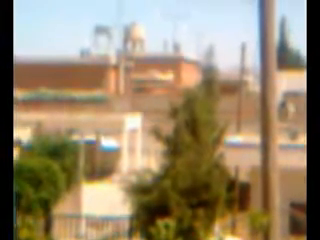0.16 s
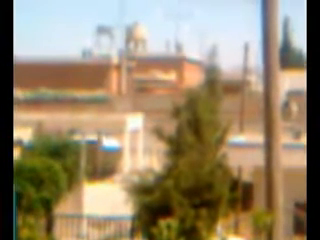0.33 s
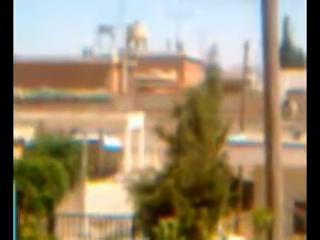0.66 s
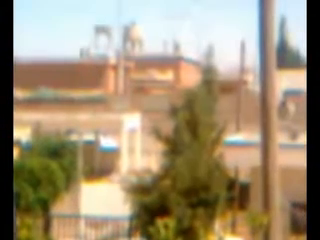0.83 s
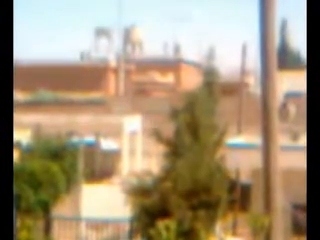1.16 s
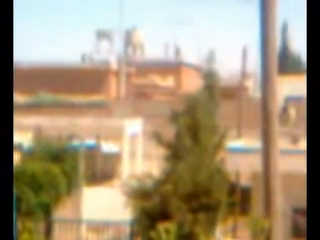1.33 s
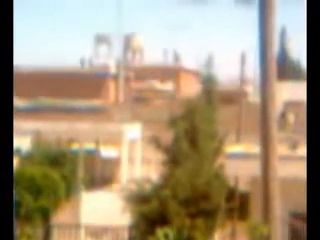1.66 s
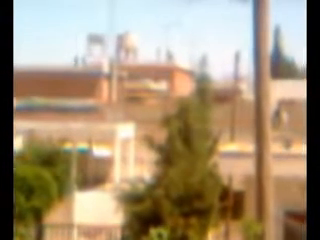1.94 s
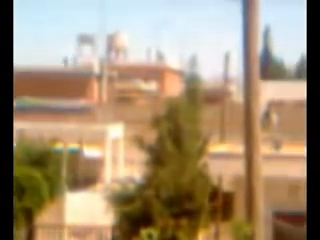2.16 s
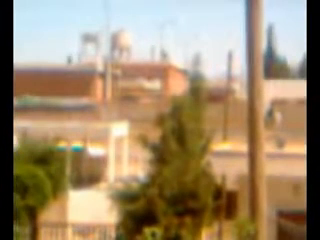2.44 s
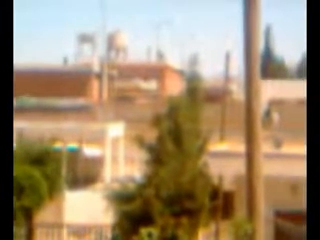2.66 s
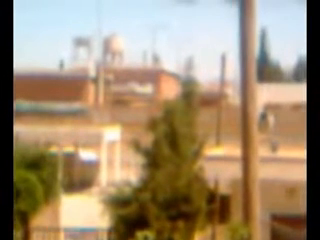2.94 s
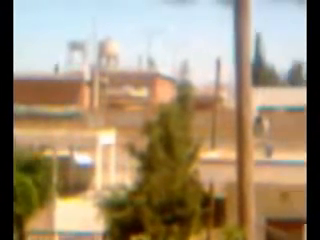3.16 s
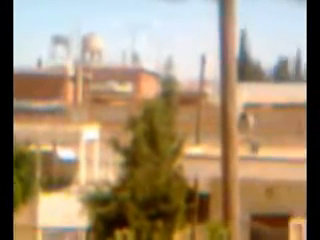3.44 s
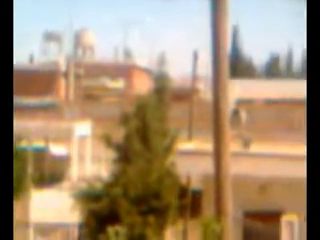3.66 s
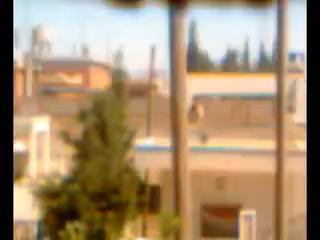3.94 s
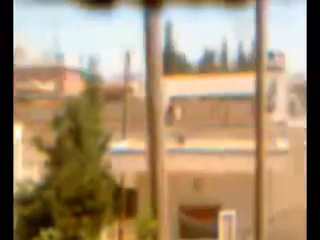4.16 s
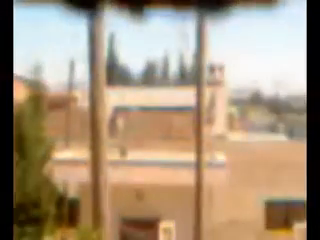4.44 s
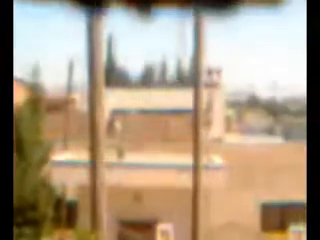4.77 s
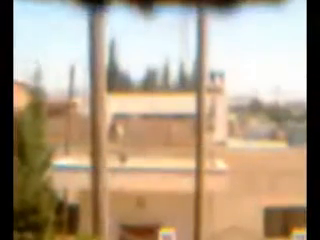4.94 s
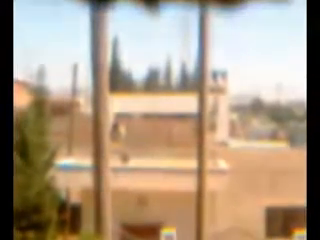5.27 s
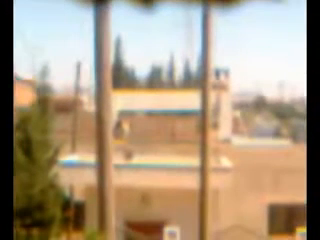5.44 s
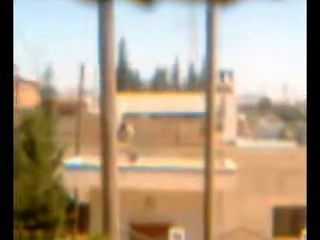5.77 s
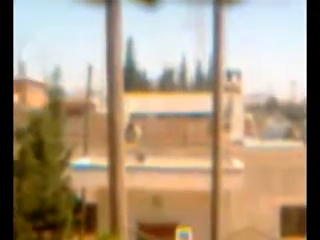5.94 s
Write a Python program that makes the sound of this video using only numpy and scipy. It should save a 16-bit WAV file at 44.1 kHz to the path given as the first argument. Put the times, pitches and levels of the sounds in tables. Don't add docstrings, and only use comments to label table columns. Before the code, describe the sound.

A long burst of automatic rifle fire cracks and booms across a town, then two duller distant shots and two sharp louder ones, on an overloaded microphone.

```python
import sys
import numpy as np
from scipy import signal
from scipy.fft import rfft, irfft, next_fast_len
from scipy.io import wavfile
from scipy.ndimage import uniform_filter1d

SR = 44100
rng = np.random.default_rng(int(sys.argv[2]) if len(sys.argv) > 2 else 0)


def convert_level_to_amplitude(level_db):
    exponent = np.asarray(level_db, float) / 20
    return 10 ** exponent


def pcm_store(signal):
    levels = np.round(np.clip(np.atleast_2d(signal), -1, 1) * 32767)
    wavfile.write(sys.argv[1], SR, levels.astype(np.int16).T)


N = 269451
LEAD = 52920


def linear(points, at):
    return np.interp(at, *np.transpose(points))


def read(points, at):
    x, value = np.transpose(points)
    return np.interp(np.log(at + 1), np.log(x + 1), value)


def evened(x):
    return x / np.sqrt(np.mean(x ** 2) + 1e-20)


def add(mix, s, sound):
    part = mix[LEAD + round(s * SR):][:len(sound)]
    part += sound[:len(part)]


def coloured(x, spectrum, size=4096):
    hz = abs(np.fft.fftfreq(size, 1 / SR))
    gain_db = np.maximum(read(spectrum + [(SR / 2, -90)], hz), -90)
    log_gain = np.log(convert_level_to_amplitude(gain_db))
    response = np.exp(np.conj(signal.hilbert(log_gain)))
    taps = np.fft.ifft(response).real[:size // 2]
    return signal.oaconvolve(x, taps / np.linalg.norm(taps))[:len(x)]


def scatter(envelope, per_s=2500., spread_db=0.0, clump_db=-1.0):
    draw = rng.random((len(envelope), 4))
    clumps = evened(uniform_filter1d(uniform_filter1d(draw[:, 3] - .5, size=130), size=90))
    uneven_db = spread_db * np.minimum(-np.log(draw[:, 1] + 1e-9), 4)
    size = convert_level_to_amplitude(uneven_db + clump_db * clumps) * np.sign(draw[:, 2] - .5)
    present = draw[:, 0] < per_s / SR
    return envelope * evened(size * present)


def taps_of(rows, wobble_db=4.0):
    out = np.zeros(SR // 10)
    for s, db in rows:
        out[round(abs(s) * SR)] += convert_level_to_amplitude(db + wobble_db * rng.uniform(-0.66, 1))
    return out


def burst():
    # (crack arrives [s], crack peak [dB])
    swing_in = [(0.0, 0), (0.116, -0.5), (0.2253, -2), (0.3239, -2), (0.4341, -7.5), (0.5502, -7),
                (0.6498, 3), (0.7642, -1.5), (0.8579, 0.5), (0.9623, -3), (1.055, -1.5), (1.1672, -9),
                (1.272, -4.5), (1.3703, -7), (1.482, -12.5), (1.5836, -2.5), (1.6891, -15.5), (1.8102, -24),
                (1.9022, -21), (2.017, -20.5), (2.1185, -18.5), (2.2324, -10), (2.347, -10)]
    # (crack arrives [s], crack peak [dB])
    swing_out = [(2.452, -6), (2.5512, -4.5), (2.6531, -8), (2.7598, -7.5), (2.8645, -5.5), (2.9552, -4),
                 (3.0544, -10), (3.1487, -9), (3.2561, -4), (3.3487, -6.5), (3.4372, -7), (3.5304, -4),
                 (3.6254, -6.5), (3.71, -3.5), (3.8265, -1), (3.9396, -1), (4.0535, -1.5), (4.168, -2.5),
                 (4.2868, -4.5), (4.4048, -3.5)]
    # (time [s], lag [ms])
    aim = [(-.1, 108.5), (.35, 107.5), (.55, 105), (.85, 106), (1.27, 100.5), (1.69, 86), (1.82, 82),
           (2.25, 81.5), (2.5, 77.5), (2.86, 76), (3.15, 90.5), (3.44, 113), (3.7, 123), (3.83, 130),
           (4.05, 130), (4.17, 136), (4.41, 134.5)]
    # (time [s], level [dB])
    muzzle = [(-.1, 0.5), (.5, -6), (1.1, -4), (1.6, -2.5), (2.1, 2), (2.4, -0.5), (2.8, 2.5), (3.05, 1.5),
              (3.25, -1.5), (3.45, -22), (3.7, -13), (4.0, -25.5), (4.3, -39.5), (4.41, -12.5)]
    # (frequency [Hz], level [dB])
    crack_spectrum = [(60, -30), (400, -20.5), (900, -18), (1400, -10), (1900, -2.5), (2300, -0.5),
                      (2600, -3), (2900, -11), (3500, -22.5), (4000, -37.5)]
    # (delay [s], level [dB])
    crack_taps = [
        (0, 0),
        (.00087, -3),
        (.0013, -3),
        (.0022, -8),
        (.041, -6),
    ]
    # (delay [s], level [dB])
    near_wall_taps = [(.0135, 0), (.0144, -3)]
    # (time [s], level [dB])
    near_wall = [(-1, -11), (1, -10), (2, -8), (3.5, -8), (4, -12), (4.4, -13)]
    # (delay [s], level [dB])
    walls = [(.002, -23.5), (.005, -5), (.013, -6), (.019, 0.5), (.027, -3.5), (.031, -0.5), (.055, -14.5),
             (.1, -23.5), (.2, -52)]
    # (frequency [Hz], level [dB])
    boom_spectrum = [(40, -30), (90, -17), (190, -11), (290, 0), (400, -4), (500, -7), (700, -16),
                     (1050, -16), (1500, -27), (4000, -60)]
    # (delay [s], level [dB])
    boom_taps = [(.001, -2), (.0049, -3.1), (.0087, -11.5), (.016, -16), (.0195, -17)]
    # (delay [s], level [dB])
    boom_echo_taps = [(.0248, -4), (.028, 1), (.0312, -4), (.0344, -0.5), (.055, -0.5), (.0585, -22)]
    # (frequency [Hz], level [dB])
    roll_spectrum = [(40, -35), (90, -6.5), (200, -9.5), (320, -0.5), (480, -5.5), (700, -10),
                     (1000, -23.5), (4000, -44)]
    # (frequency [Hz], level [dB])
    splash_spectrum = [(60, -35), (300, -2.5), (700, -17), (1050, -3), (1400, -4), (2200, -4.5),
                       (2700, -14.5), (3300, -16), (4000, -37.5)]

    boom_db, boom_echo_db, bright_db, wall_db, roll_db = -17, -14, -9, -5, -3
    echo_follows, bright_follows, wall_follows = .06, 0.39, 0.16
    shaded_ms, loss_db_per_ms = 128, 0.26
    round_spread_db = 2.17
    earlier_period_s, earlier_rounds = .1, 10

    cracks, booms, rolls, splash = np.zeros((4, LEAD + N))
    t = np.arange(SR // 5) / SR
    wall_decay = convert_level_to_amplitude(linear(walls, t))
    roll_decay = convert_level_to_amplitude(-60 * t / .2) * np.minimum(t / .02, 1)
    splash_decay = convert_level_to_amplitude(-60 * t / 0.18) * np.minimum(t / 0.0026, 1)
    earlier = [(-earlier_period_s * k, swing_in[1][1]) for k in range(earlier_rounds, 0, -1)]
    for s, crack_db in earlier + list(swing_in) + list(swing_out):
        add(cracks, s, convert_level_to_amplitude(crack_db + 15.5) * taps_of(crack_taps))
        add(cracks, s, convert_level_to_amplitude(linear(near_wall, s) + 18) * taps_of(near_wall_taps))
        add(cracks, s, scatter(convert_level_to_amplitude(wall_db + wall_follows * crack_db) * wall_decay, clump_db=2.0))

        lag_ms = linear(aim, s)
        later = s + lag_ms / 1000
        muzzle_db = linear(muzzle, s)
        luck_db = round_spread_db * rng.standard_normal(3)
        echo_db = boom_echo_db + echo_follows * muzzle_db + luck_db[1]
        echo_db -= loss_db_per_ms * max(lag_ms - shaded_ms, 0)
        splash_db = bright_db + bright_follows * muzzle_db + luck_db[2]
        direct_db = boom_db + muzzle_db + luck_db[0]
        add(booms, later, -convert_level_to_amplitude(direct_db + 26.5) * taps_of(boom_taps, wobble_db=6.5))
        add(booms, later, -convert_level_to_amplitude(echo_db + 14.0) * taps_of(boom_echo_taps, wobble_db=2.0))
        add(rolls, later, scatter(convert_level_to_amplitude(echo_db + roll_db) * roll_decay, per_s=1800.0))
        add(splash, later, scatter(convert_level_to_amplitude(splash_db) * splash_decay, per_s=2400.0))
    diffuse = coloured(rolls, roll_spectrum) + coloured(splash, splash_spectrum)
    return coloured(cracks, crack_spectrum), coloured(booms, boom_spectrum), diffuse


def singles():
    # (time [s], peak [dB], echoes [dB], dullness [0-1], edge [0-1])
    far_gun = [
        (5.139, -12, -13, 0.47, 0.23),
        (5.437, -13.5, -13.5, 0.84, 0.65),
    ]
    # (time [s], peak [dB], echoes [dB], dullness [0-1], edge [0-1])
    near_gun = [
        (5.807, -0.8, -8, 0.06, 0.3),
        (6.063, -0.95, -4, 0.0068, 0.13),
    ]
    # (delay [s], level [dB], scatter t60 [s])
    far_echoes = [(.004, -9.5, 0.017), (.019, -13, 0.074), (.044, -11, 0.19), (.093, -12, 0.27),
                  (.136, -4.5, 0.068), (.151, -18, 0.19), (.161, -5, 0.062), (.177, -10, 0.13),
                  (.249, -56, 0.21)]
    # (delay [s], level [dB], scatter t60 [s])
    near_echoes = [(.003, -20.5, .05), (.017, -5, .04), (.03, -1.5, .15), (.074, -6, .14),
                   (.147, -46, 0.087)]
    # (frequency [Hz], level [dB])
    near_spectrum = [(60, -38.5), (500, -25.5), (800, -10), (1200, 1.5), (1600, -4.5), (2200, 0),
                     (2600, -8.5), (3200, -34), (4000, -35)]
    # (frequency [Hz], level [dB])
    far_spectrum = [(60, -30.5), (250, -7), (500, -7), (800, -4.5), (1300, -4), (2100, 2.5), (2600, -3.5),
                    (3200, -18), (4000, -38)]
    # (frequency [Hz], level [dB])
    edge_spectrum = [(500, 1), (1500, 11), (2500, 11), (3200, 18), (3600, -17), (4000, -32)]

    near, far, sharp = np.zeros((3, LEAD + N))
    t = np.arange(SR // 3) / SR
    far_arrivals = arrivals(far_gun, far_echoes, front_t60=0.088)
    near_arrivals = arrivals(near_gun, near_echoes, front_t60=0.11)
    for s, peak_db, t60, dull, edge in [*far_arrivals, *near_arrivals]:
        cloud = convert_level_to_amplitude(peak_db - 6.0 - 60 * t / max(t60, .01))
        arrival = scatter(cloud, per_s=5600.0, clump_db=-1.5)
        arrival[0] += convert_level_to_amplitude(peak_db - 4)
        share = np.clip(dull, 0, 1)
        add(near, s, np.sqrt(1 - share) * arrival)
        add(far, s, np.sqrt(share) * arrival)
        add(sharp, s, np.clip(edge, 0, 1) * arrival)
    return coloured(near, near_spectrum) + coloured(sharp, edge_spectrum), coloured(far, far_spectrum)


def arrivals(rounds, echoes, front_t60):
    echo_dullness, echo_edge = 0.62, 0.72
    for s, peak_db, echoes_db, dull, edge in rounds:
        yield s, peak_db, front_t60, dull, edge
        for delay, db, t60 in echoes:
            if s + delay < N / SR:
                echo_dull = dull + echo_dullness * delay * 10 * (1 - dull)
                yield s + delay, echoes_db + db, t60, echo_dull, echo_edge * edge


def town(x, count=3, turns_per_s=3.1):
    # (frequency [Hz], t60 [s])
    town_t60 = [(100, 0.98), (300, 1.22), (500, 2.36), (800, 1.73), (1600, 1.72), (2500, 1.68),
                (4000, 1.91)]
    patchy_db = 3
    angle = 2 * np.pi * turns_per_s * np.arange(len(x)) / SR
    out = np.zeros(len(x))
    for k in range(count):
        reflections = scatter(np.ones(2 * SR), per_s=700., spread_db=10.0)
        hz, t, z = signal.stft(reflections, SR, nperseg=512)
        patches = uniform_filter1d(rng.standard_normal(z.shape), size=5, axis=0)
        patches = evened(uniform_filter1d(patches, size=7, axis=1))
        decay_db = -60 * t / read(town_t60, hz)[:, None]
        onset = np.minimum(t / 0.028, 1)
        tail = signal.istft(z * convert_level_to_amplitude(patchy_db * patches + decay_db) * onset, SR, nperseg=512)[1]
        turn = np.sqrt(2 / count) * np.cos(angle + np.pi * k / count)
        out += signal.fftconvolve(x * abs(turn), tail / np.linalg.norm(tail))[:len(x)]
    return out


def street():
    # (frequency [Hz], level [dB per Hz])
    street_spectrum = [(40, -33.5), (150, -14), (400, -27), (800, -19), (1300, -10.5), (2000, -2.5),
                       (2600, -11), (3200, -25.5), (4000, -39)]
    return convert_level_to_amplitude(-41) * coloured(rng.standard_normal(LEAD + N), street_spectrum)


def scene():
    cracks, booms, rolls = burst()
    near, far = singles()
    to_town = convert_level_to_amplitude(-12.5) * cracks + convert_level_to_amplitude(-12) * booms + convert_level_to_amplitude(-4.0) * rolls
    to_town = to_town + convert_level_to_amplitude(-21.0) * near + convert_level_to_amplitude(-0.5) * far
    return (cracks + booms + rolls + near + far + town(to_town) + street())[None, LEAD:]


def band_limit(x):
    return signal.sosfilt(signal.butter(12, 13300, fs=SR, output="sos"), x)


def record(dry):
    # (frequency [Hz], level [dB])
    playback = [(6800, 0), (7200, -7), (8700, -7), (9300, -9), (9950, -15), (10150, -70)]
    camera_sr = 8000
    t = np.arange(N) / SR
    low = np.interp(np.arange(N * camera_sr // SR) / camera_sr, t, dry[0])
    level = np.sqrt(abs(uniform_filter1d(low ** 2, size=80)))
    low = low + convert_level_to_amplitude(-25) * level * rng.standard_normal(len(low))
    low = .88 * np.tanh(low / .88)
    joined = np.interp(t, np.arange(len(low)) / camera_sr, low)
    size = next_fast_len(N)
    hz = np.fft.rfftfreq(size, 1 / SR)
    kept = rfft(joined, size) * convert_level_to_amplitude(read(playback, hz))
    top = irfft(kept * (hz > 8900), size)[:N]
    mirrored = convert_level_to_amplitude(-17) * top * (-1.) ** np.arange(N)
    return band_limit((irfft(kept, size)[:N] + mirrored)[None])


dry = scene()
out = record(dry)
pcm_store(out)
```